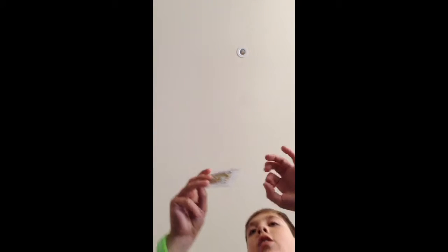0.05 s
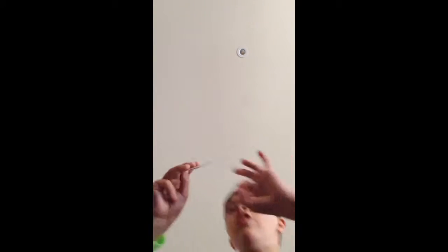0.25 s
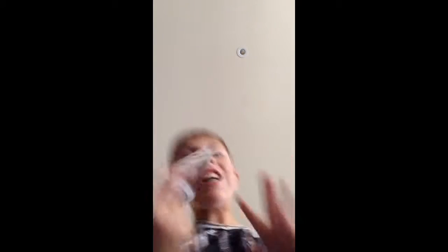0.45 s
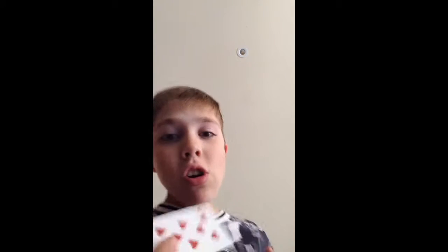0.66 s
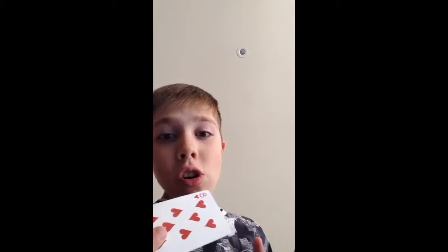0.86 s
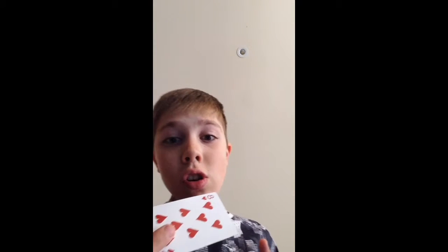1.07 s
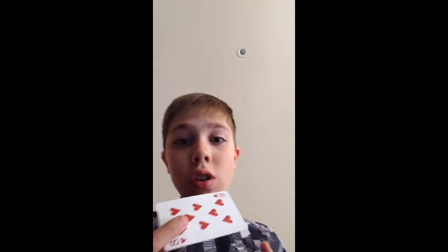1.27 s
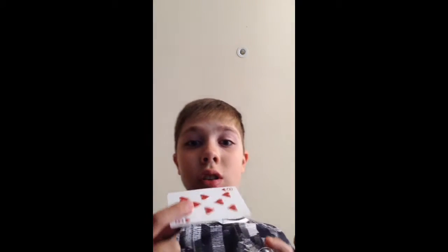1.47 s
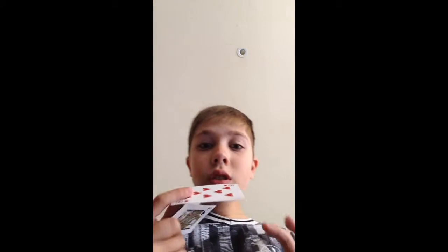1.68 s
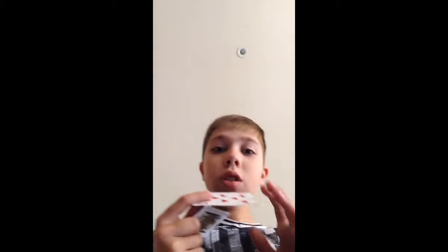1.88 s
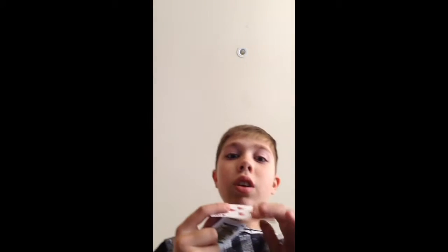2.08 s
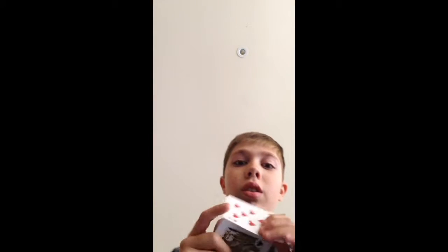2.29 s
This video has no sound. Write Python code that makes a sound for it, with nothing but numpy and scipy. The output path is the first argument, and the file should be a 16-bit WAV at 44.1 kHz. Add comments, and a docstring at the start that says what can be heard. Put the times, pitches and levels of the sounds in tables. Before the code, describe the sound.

One sharp snap of a flicked playing card indoors, then faint sliding and ticking.

```python
"""A playing card is flicked through the air and snaps into the fingers, close by in a small bare room.
The stiff card cracks, rebounds and is clapped still: each snap excites its damped bending modes, and
the walls reverberate for half a second. Before and after, it slides by stick-slip friction and ticks
softly between the fingers, over a sleeve's rustle, a faint appliance hum and a passing low drone."""
import sys
import numpy as np
from scipy import signal
from scipy.fft import rfft, irfft
from scipy.io import wavfile

SR = 44100
rng = np.random.default_rng(int(sys.argv[2]) if len(sys.argv) > 2 else 0)


def master_out(mix):
    """Clip the mix to full scale and print it as 16-bit PCM to the path in sys.argv[1]."""
    frames = np.transpose(np.atleast_2d(mix))
    ceiling = np.clip(frames, -1, 1)
    pcm = np.round(ceiling * 32767).astype(np.int16)
    wavfile.write(sys.argv[1], SR, pcm)


N = 103458

# Spectrum of the room's air noise: frequency_hz, gain_db
AIR_SPECTRUM = [(25, -27), (60, -12), (85, -2), (120, -11.5), (170, -9), (260, 1), (400, -7.5), (650, -8),
                (900, -14.5), (1300, -17), (2000, -19.5), (2800, -15.5), (4000, -22.5), (8000, -24),
                (15000, -23)]
# Tones of the appliance: pitch_hz, level_db
HUM_TONES = [(168, -86.5), (252, -87.5), (545, -83.5), (595, -81.5), (743, -87), (793, -91)]
# Tones of the low drone: pitch_hz, gain_db
DRONE_TONES = [(84, -21), (168, -6), (252, -3.5), (334, -8.5)]
# Swell and fade of the drone: time_s, level_db
DRONE_ENVELOPE = [(0, -86), (.75, -82.5), (.92, -76), (.99, -63), (1.07, -79.5), (1.25, -75), (1.45, -81.5),
                  (1.751, -86), (2.346, -89.5)]
# Card sliding between the fingers, one curve a stroke: time_s, level_db
SLIDE_ENVELOPES = [
    [(0, -47), (.006, -36), (.02, -56.5), (.04, -44), (.045, -47.5), (.055, -55), (.075, -55), (.1, -56.5),
     (.16, -58), (.22, -60.5), (.36, -62)],
    [(1.65, -82), (1.805, -72.5), (1.815, -58.5), (1.84, -68), (2.0, -68.5), (2.15, -62), (2.285, -54.5),
     (2.3, -49.5), (2.312, -42.5), (2.346, -44.5)],
]
# Spectrum of the sliding: frequency_hz, gain_db
SLIDE_SPECTRUM = [(30, -33), (100, -23.5), (220, -2.5), (420, -2.5), (700, 2.5), (1200, 1), (1800, -1.5),
                  (2300, 3), (3100, -1), (4200, -17.5), (5300, -9.5), (6500, -27.5), (8200, -24),
                  (10000, -32.5), (16000, -39.5)]
# Rustle of sleeve and arm: time_s, level_db
SLEEVE_ENVELOPE = [(0, -56), (.04, -49.5), (.068, -44), (.095, -56.5), (.15, -56.5), (.22, -70), (.35, -72)]
# Dull spectrum of the rustle: frequency_hz, gain_db
SLEEVE_SPECTRUM = [(30, -50), (100, -20), (200, -4.5), (420, -0.5), (850, -3.5), (1300, -16.5), (3000, -30),
                   (16000, -55.5)]
# The flying card brushing the hand: time_s, level_db
BRUSH_ENVELOPE = [(.362, -66.5), (.378, -53.5), (.385, -40), (.395, -43), (.404, -34), (.42, -37),
                  (.432, -43.5), (.443, -43), (.451, -27), (.458, -40), (.47, -44.5)]
# Spectrum of the brushing and of the fibres' crack: frequency_hz, gain_db
PAPER_SPECTRUM = [(30, -21), (70, -18), (130, -1.5), (400, 0), (1000, -3.5), (2900, 2), (3900, -8),
                  (5200, -5), (6500, -8.5), (8500, -3.5), (11000, -11.5), (16000, -20)]
# Bending modes of the card: pitch_hz, gain_db, t60_s
CARD_MODES = [(813, -15.5, .019), (1620, -13, 0.0076), (2350, -21, 0.033), (2917, -6, 0.0075),
              (3930, -26, 0.011), (4950, -13.5, 0.0057), (5640, -21, 0.0051), (7480, -19, 0.0066),
              (8550, -19, 0.0074), (11500, -27, .004), (14900, -25, .003)]
# Snaps of the card: start_s, gain_db, treble_db
CARD_SNAPS = [(.0035, -31.5, -25.5), (.3286, -51.5, 2), (.3690, -34, -6), (0.3973, -0.5, -1),
              (0.4119, -12.5, 1), (0.4134, -16, -15.5), (0.4456, -31, 12.5), (0.4496, -23.5, 7.5),
              (.4645, -44, 15.5), (1.8115, -45.5, -3.5), (2.0440, -43, -10)]
# Damped contacts of card and fingers: start_s, level_db, pitch_hz, swell_s
FINGER_TAPS = [(.0040, -35, 834, 0.0037), (.0430, -46, 450, 0.0019), (0.247, -36, 1365, 0.00057),
               (0.309, -46.5, 2960, 0.00055), (0.3684, -36, 1520, 0.00023), (0.3857, -29, 1020, 0.00046),
               (0.4104, -29.5, 130, 0.00082), (.4126, -24.5, 860, 0.0011), (.4122, -16, 2324, 0.00066),
               (.4371, -14.5, 1100, 0.00025), (.4472, -22.5, 330, 0.002), (.4494, -19, 1950, 0.00092),
               (.4505, -23, 706, 0.0012), (2.2009, -39, 1640, 0.00048), (2.263, -44.5, 2460, 0.00085),
               (2.2932, -36.5, 3020, 0.00044), (2.3052, -33.5, 2700, 0.00099), (2.3208, -29.5, 2930, .001),
               (2.3235, -21.5, 3066, 0.00092), (2.3240, -39, 1740, 0.002), (2.3265, -57, 620, 0.0017)]
# Squeaks and hisses of skin on the card's finish: start_s, length_s, level_db, pitch_hz, width_hz
SKIN_SQUEAKS = [(.4455, 0.003, -41, 9480, 2000), (.4498, 0.0036, -26.5, 8000, 2200),
                (0.719, 0.05, -69, 5330, 696), (1.417, .07, -73.5, 1240, 170), (1.471, .06, -77, 1268, 250),
                (1.814, .04, -73.5, 7600, 303), (1.859, 0.28, -74, 8180, 500),
                (1.86, 0.3, -74.5, 3380, 350), (2.042, 0.0088, -66, 5400, 910),
                (2.087, 0.21, -73, 8280, 496), (2.169, 0.052, -67, 8430, 500),
                (2.303, 0.044, -52.5, 5040, 550)]
# Spectrum of the reverberant tail: frequency_hz, gain_db
TAIL_SPECTRUM = [(40, -18), (150, -5.5), (310, 2), (500, -2), (780, 1), (1100, 1), (2200, -1.5),
                 (2900, -1.5), (4000, 0.5), (5300, 0.5), (8000, -1.5), (15000, 0.5)]
# Reverberation time of the room: frequency_hz, t60_s
TAIL_DECAY = [(100, 0.93), (270, .85), (600, 0.74), (1400, 0.87), (2700, 0.84), (5000, 0.61), (8000, 0.5),
              (15000, 0.3)]


def amp(db):
    """Amplitude ratio for a level in decibels."""
    return 10 ** (np.asarray(db) / 20)


def unit(x):
    """Normalisation to an rms of 1."""
    return x / np.sqrt(np.mean(x ** 2) + 1e-20)


def read(points, hz):
    """Interpolation on a logarithmic frequency axis."""
    f, value = np.transpose(points)
    return np.interp(np.log(hz + 1), np.log(f + 1), value)


def colour(x, spectrum):
    """Linear filtering: each frequency is scaled by the spectrum's gain."""
    gain = amp(read(spectrum, np.fft.rfftfreq(len(x), 1 / SR)))
    return irfft(rfft(x) * gain, len(x))


def cut(x, hz, kind, order=2):
    """Maximally flat low-pass or high-pass filtering."""
    return signal.sosfilt(signal.butter(order, hz, kind, fs=SR, output="sos"), x)


def band(hz, width_hz):
    """Narrow-band noise: the narrower its bell-shaped spectrum, the slower it fluctuates."""
    bell = np.exp(-((np.fft.rfftfreq(N, 1 / SR) - hz) / width_hz) ** 2)
    return unit(irfft(rfft(rng.standard_normal(N)) * bell, N))


def hum(tones, depth=0.55, waver_hz=4):
    """Slow random modulation of amplitude and phase makes steady tones waver."""
    t = np.arange(N) / SR
    sound = np.zeros(N)
    for hz, db in tones:
        amplitude = amp(db) * np.sqrt(2) * (1 + depth * band(0, waver_hz))
        sound += amplitude * np.sin(2 * np.pi * hz * t + depth * band(0, waver_hz))
    return sound


def background(air_db=-71):
    """Superposition of broadband air noise, an appliance hum and a drone that swells and fades."""
    air = amp(air_db) * unit(colour(rng.standard_normal(N), AIR_SPECTRUM))
    swell = amp(np.interp(np.arange(N) / SR, *np.transpose(DRONE_ENVELOPE)))
    return air + hum(HUM_TONES) + swell * hum(DRONE_TONES)


def friction(envelope, spectrum, slips_per_s=4300, spread_db=3.5, slip_share=0.49):
    """Stick-slip friction: tiny impulses of uneven size share the power with a smooth hiss."""
    slips = (rng.random(N) < slips_per_s / SR) * rng.choice([-1, 1], N)
    sizes = amp(spread_db * np.minimum(rng.exponential(1, N), 4))
    hiss = rng.standard_normal(N)
    drive = np.sqrt(slip_share) * unit(slips * sizes) + np.sqrt(1 - slip_share) * hiss
    level_db = np.interp(np.arange(N) / SR, *np.transpose(envelope), left=-np.inf, right=-np.inf)
    return unit(colour(drive, spectrum)) * amp(level_db)


def card_snap(gain_db, treble_db, crack_db=-18.5, crack_decay_s=0.0057, radiate_hz=605, split_hz=3900):
    """Free vibration: the card springs straight and its modes ring over a crack of paper fibres."""
    t = np.arange(4096) / SR
    ring = sum(amp(db - 60 * t / t60) * np.sin(2 * np.pi * hz * t) for hz, db, t60 in CARD_MODES)
    fibres = unit(colour(rng.standard_normal(len(t)), PAPER_SPECTRUM))
    crack = amp(crack_db) * np.exp(-t / crack_decay_s) * fibres
    radiated = cut(ring + crack, radiate_hz, "high")  # at lower frequencies air slips round the card
    body = cut(cut(radiated, split_hz, "low"), split_hz, "low")
    treble = cut(cut(radiated, split_hz, "high"), split_hz, "high")
    return amp(gain_db) * (body + amp(treble_db) * treble)


def finger_tap(level_db, pitch_hz, swell_s):
    """Damped oscillation: a soft contact builds up briefly and the skin absorbs it."""
    t = np.arange(4096) / SR
    envelope = t / swell_s * np.exp(1 - t / swell_s)
    return amp(level_db) * envelope * np.sin(2 * np.pi * pitch_hz * t)


def skin_squeak(length_s, level_db, pitch_hz, width_hz):
    """Friction-driven resonance: a fingertip drags on the card and a fuzzy whistle swells and fades."""
    arch = np.sin(np.pi * np.minimum(np.arange(N) / SR / length_s, 1))
    return amp(level_db) * arch * band(pitch_hz, width_hz)


def scatter(envelope):
    """Diffuse scattering: random reflections under an envelope, with a near-flat spectrum and energy 1."""
    x = rng.standard_normal(len(envelope)) * envelope
    limit = 2 * envelope / np.linalg.norm(envelope)
    for _ in range(8):
        flattened = irfft(np.exp(1j * np.angle(rfft(x))), len(x))
        x = np.clip(flattened, -limit, limit)
    return x / np.linalg.norm(x)


def room(x, near_db=-10, near_delay_s=.003, near_t60_s=.04, tail_db=-13, tail_delay_s=.008):
    """Reverberation: early scatter from hands and body, then the tail of the bare walls."""
    t = np.arange(SR) / SR
    near = scatter(amp(-60 * t / near_t60_s) * (t > near_delay_s))
    hz, frame_s, noise = signal.stft(rng.standard_normal(SR), SR, nperseg=256)
    decay = amp(-60 * frame_s / read(TAIL_DECAY, hz)[:, None])
    tail = signal.istft(noise * decay, SR, nperseg=256)[1][:SR]
    window = (t > tail_delay_s) * np.minimum(10 * (1 - t), 1)
    tail = colour(tail / np.linalg.norm(tail), TAIL_SPECTRUM) * window
    return x + signal.fftconvolve(x, amp(near_db) * near + amp(tail_db) * tail)[:N]


def scene():
    """Superposition: friction, snaps, taps and squeaks excite the room, over the background."""
    direct = friction(BRUSH_ENVELOPE, PAPER_SPECTRUM) + friction(SLEEVE_ENVELOPE, SLEEVE_SPECTRUM)
    direct += sum(friction(stroke, SLIDE_SPECTRUM) for stroke in SLIDE_ENVELOPES)
    for source, events in (card_snap, CARD_SNAPS), (finger_tap, FINGER_TAPS), (skin_squeak, SKIN_SQUEAKS):
        for start_s, *settings in events:
            start = round(start_s * SR)
            sound = source(*settings)[:N - start]
            direct[start:start + len(sound)] += sound
    return (room(direct) + background())[None]


def record(dry, bass_hz=130, leak_db=-22.5, treble_hz=13500, edge_hz=15350):
    """Band limiting: a phone's response thins the bass, softens the treble and ends at a steep edge."""
    thin = cut(dry, bass_hz, "high", order=4) + amp(leak_db) * dry
    soft = cut(thin, treble_hz, "low")
    edge = signal.firwin(511, edge_hz, window=("kaiser", 8), fs=SR)
    return signal.oaconvolve(soft, edge[None], "same")


dry = scene()
out = record(dry)
master_out(out)
```